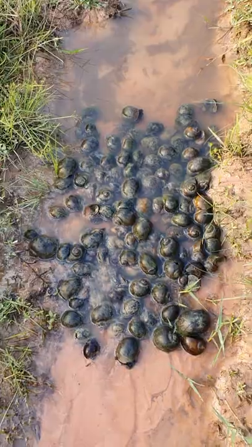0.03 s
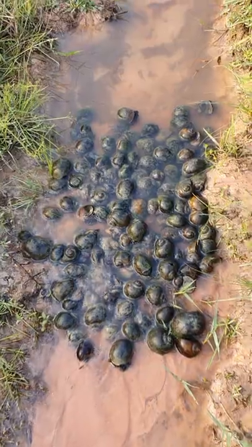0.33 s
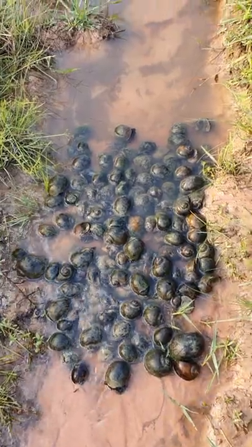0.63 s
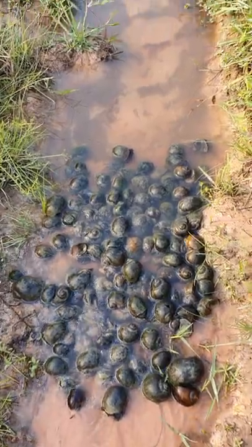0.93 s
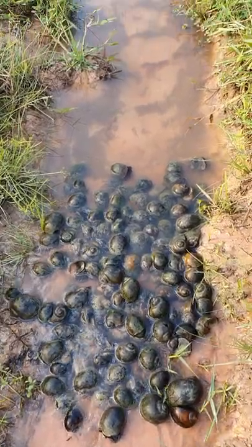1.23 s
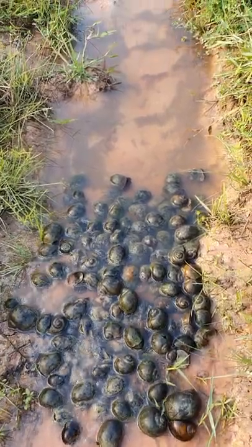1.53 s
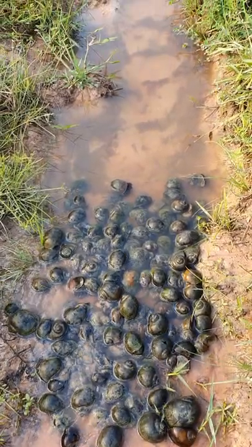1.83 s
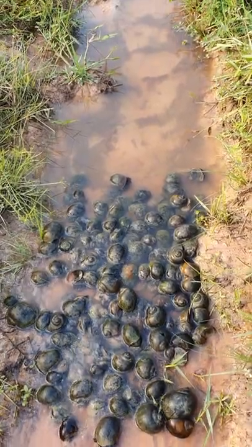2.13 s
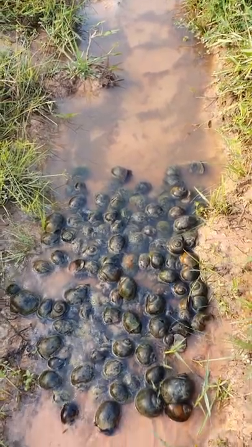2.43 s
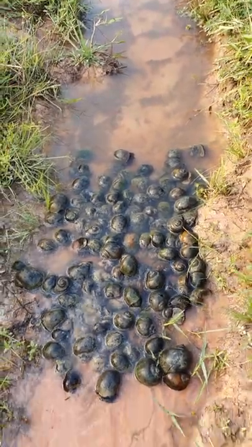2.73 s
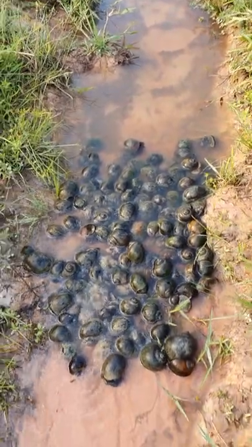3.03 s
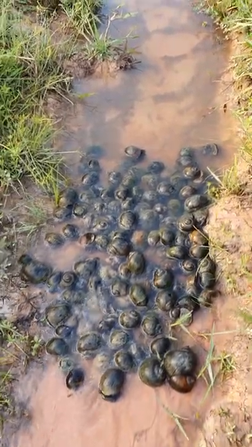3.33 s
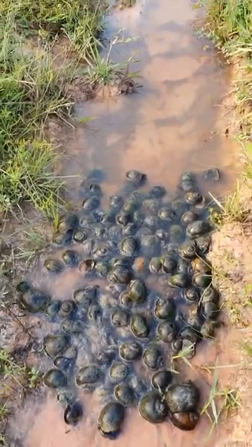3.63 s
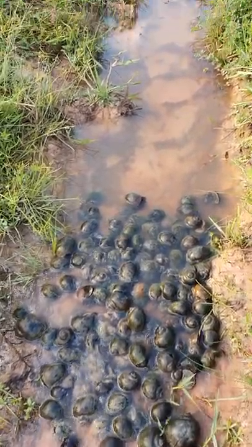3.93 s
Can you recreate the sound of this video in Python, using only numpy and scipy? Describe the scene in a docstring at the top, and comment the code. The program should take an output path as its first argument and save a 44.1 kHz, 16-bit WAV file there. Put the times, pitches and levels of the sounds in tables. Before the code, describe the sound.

Uneven thudding of a far-off engine outdoors, with nearby rustling and faint bird chirps.

```python
"""A slow engine, perhaps a water pump, thuds far off across a muddy ditch: four uneven beats a cycle
over a low rumble. Close by, clothing or grass rustles in swells as fibres rub, catch and let go,
with dull scuffs, thin squeaks, dry ticks and soft handling bumps.
A small bird repeats a falling chip, farther birds twitter, and insects hiss faintly in the open air."""
import sys
import numpy as np
from scipy import signal
from scipy.fft import rfft, irfft
from scipy.io import wavfile

SR = 44100
rng = np.random.default_rng(int(sys.argv[2]) if len(sys.argv) > 2 else 0)


def generate_wav(signal):
    """Clip the signal to [-1, 1] and save it as 16-bit WAV at the path in sys.argv[1]."""
    frames = np.transpose(np.atleast_2d(signal))
    scaled = np.clip(frames, -1, 1) * 32767
    pcm = np.round(scaled).astype(np.int16)
    wavfile.write(sys.argv[1], SR, pcm)


N = 176400
TIME = np.arange(N) / SR

# Every pan is left minus right in dB. Spectra set tone only, as level per Hz.
# the engine's wandering pace: (time [s], speed [cycles/s])
ENGINE_SPEED = [(0, 8.87), (.85, 8.85), (1.25, 9.02), (1.8, 9.06), (2.5, 8.78), (2.87, 9.23), (3.5, 9.3),
                (4, 9.08)]
# its limping rhythm: (position in the cycle [0-1], accent [dB])
ENGINE_BEATS = [(0, -1), (0.267, -4), (0.384, -8.5), (.742, -5.5)]
# one fader for the engine and the far birds: (time [s], gain [dB])
DISTANT_FADER = [(.1, -59.5), (.8, -60), (1.12, -54.5), (1.28, -58), (1.42, -54), (1.6, -52), (2, -49),
                 (2.7, -49), (2.87, -49.5), (3.2, -47.5), (3.65, -47), (4, -51)]
# the boom of one thud: (frequency [Hz], level [dB])
THUD_SPECTRUM = [(20, -31), (42, -4), (65, -0.5), (105, 4.5), (126, -9.5), (142, 0), (155, -6), (170, 3),
                 (190, -12), (235, -9), (320, -24.5), (600, -40), (1200, -60)]
# the low bed under the thuds: (frequency [Hz], level [dB])
RUMBLE_SPECTRUM = [(20, -29), (32, -12), (42, -6), (58, 1), (100, -3), (150, -5), (220, -8), (320, -21.5),
                   (500, -32), (900, -43), (2000, -64.5)]
# swells of rubbing: (time [s], body gain [dB], treble gain [dB])
RUSTLE_SWELLS = [(.1, -88, -97), (.27, -74, -91), (.35, -70, -75), (.54, -66.5, -67.5), (.63, -70.5, -77),
                 (.74, -75.5, -79), (.84, -74.5, -85), (.98, -70, -75.5), (1.13, -64.5, -66.5),
                 (1.27, -68, -77.5), (1.41, -60.5, -63.5), (1.51, -56, -58.5), (1.66, -60.5, -66.5),
                 (1.73, -57, -59), (1.895, -65.5, -69), (1.912, -57, -59.5), (2.03, -61, -67.5),
                 (2.14, -57, -57.5), (2.24, -55.5, -60), (2.29, -51, -53.5), (2.35, -55, -60),
                 (2.47, -60, -65), (2.56, -55, -56.5), (2.67, -60, -63), (2.735, -54, -52.5),
                 (2.78, -61, -66), (2.92, -60, -62), (3.05, -48.5, -53.5), (3.13, -56.5, -58.5),
                 (3.24, -55.5, -60.5), (3.41, -63.5, -67.5), (3.57, -53, -56.5), (3.69, -53, -55),
                 (3.795, -59.5, -60), (3.82, -64, -67.5), (3.88, -64, -64.5), (4, -58.5, -60)]
# the rustle's papery midrange: (frequency [Hz], level [dB])
BODY_SPECTRUM = [(250, -11.5), (550, -15), (850, -13), (1150, -8.5), (1450, -4), (1700, -1), (2000, 1),
                 (2350, 0.5), (2800, -2.5), (4200, -4.5), (5800, -12.5), (7500, -25.5), (10000, -41)]
# the airy top of the rustle and ticks: (frequency [Hz], level [dB])
TREBLE_SPECTRUM = [(5000, -3), (7800, -13.5), (8500, -8), (9300, -1), (10500, -1), (12100, 2), (13500, -1),
                   (16000, -2)]
# the rustle's top slides from right to centre: (time [s], pan [dB])
TREBLE_PAN_PATH = [(0, -15), (1.5, -9), (3, -8), (3.4, -5), (3.7, -0.5), (4, 0.5)]
# harder strokes: (peak time [s], level [dB], half-length [s])
SCUFF_STROKES = [(0.633, -72.5, 0.029), (1.553, -66.5, 0.049), (2.326, -61.5, 0.039), (3.05, -88, .03),
                 (3.19, -63, 0.05), (3.653, -66, 0.13)]
# their dull scrape: (frequency [Hz], level [dB])
SCUFF_SPECTRUM = [(450, -12.5), (700, -1), (1200, 7), (1800, -20), (2600, -29)]
# thin rubbing squeaks: (peak time [s], pitch [Hz], resonance width [Hz], half-length [s], level [dB])
RUB_SQUEAKS = [(.655, 12700, 1200, 0.032, -72), (.738, 12150, 900, 0.023, -67.5),
               (.772, 14500, 1200, .008, -77), (0.794, 12500, 350, .006, -65),
               (1.738, 5740, 700, 0.014, -64), (1.929, 4700, 900, 0.0024, -56.5),
               (2.042, 5470, 400, .005, -62.5)]
# dry snaps: (time [s], level [dB], relative treble [dB], pan [dB])
TICK_HITS = [(0.28, -61, -19, 11), (0.292, -60, -20, 14), (0.306, -55.5, -17, 9), (1.001, -62.5, 15, -15),
             (1.011, -50, 2.5, 3), (1.026, -54, 9.5, -7), (1.664, -40, -8, 6), (1.667, -55, -15, 0),
             (1.706, -52, -14, 9), (1.907, -49.5, -5, 3), (2.679, -46, -23, 17), (2.71, -43.5, -18, 16),
             (2.851, -61, 11, -13), (3.097, -50, -13, 5), (3.254, -46.5, -2, 7), (3.604, -50, -14, 18),
             (3.662, -42.5, -21, 22), (3.792, -47, -2, 3)]
# the ring of a snap: (frequency [Hz], width [Hz], gain [dB])
TICK_MODES = [(2250, 800, 0), (4000, 1200, -4), (5500, 1200, -8)]
# shifts of the hand: (peak time [s], level [dB], half-length [s])
HAND_BUMPS = [(0.302, -62.5, 0.013), (0.626, -78.5, .02), (1.886, -73, 0.071), (2.327, -74, 0.036),
              (2.706, -60, 0.044), (3.15, -69.5, .04), (3.602, -65, 0.014), (3.659, -50.5, 0.0023)]
# hollow resonances of the held casing: (frequency [Hz], width [Hz], gain [dB])
CASING_MODES = [(269, 17, -3), (397, 71, 0), (568, 38, -1.5), (767, 84, -3)]
# the small bird's calls: (time [s], level [dB])
BIRD_CHIPS = [(0.9, -59), (1.671, -52.5), (2.405, -52.5)]
# notes around each chip: (offset [s], start pitch [Hz], end pitch [Hz], length [s], relative level [dB])
GRACE_NOTES = [(-.046, 5600, 4600, .022, -13), (-.013, 3900, 4800, .014, -9), (.025, 3200, 3350, .011, -8)]
# a thin insect hiss near 9 kHz: (frequency [Hz], level [dB])
INSECT_SPECTRUM = [(7500, -60), (8500, -14), (9100, 2.5), (9500, 1), (10200, -10), (12000, -22),
                   (16000, -23)]
# the outdoor air bed: (frequency [Hz], level [dB])
AIR_SPECTRUM = [(200, 13), (800, -11), (1300, -1), (2600, -2.5), (4200, -7), (6000, -25), (8000, -41)]

FIRST_BEAT_S, BEAT_SPREAD_DB, THUD_DB = .089, 1.9, -2.5
RUMBLE_DB, RUMBLE_ROUGH_DB, THROB_DB, THROB_PEAK_CYCLES = -4.5, 2, 1, .28
BODY_TRIM_DB, TREBLE_TRIM_DB, FLUTTER_DB, BAND_FLICKER_DB = 1, 4, 1.17, 2
BODY_LIKENESS, TREBLE_LIKENESS = .37, .15  # 0 is wide, 1 is mono
GRAINS_PER_S, GRAIN_SPREAD_DB, GRAIN_DB = 3500, 3.5, -5.5
CRACKLES_PER_S, CRACKLE_DECAY_S, TICK_DECAY_S = 18, .002, .0033
TWITTERS_PER_S, TWITTER_LOW_HZ, TWITTER_HIGH_HZ, TWITTER_DB, TWITTER_RANGE_DB = 16, 1400, 4200, -17, 4
INSECT_DB, AIR_DB = -80, -77.5


def engine():
    """Four uneven thuds a cycle, dulled by distance, over a low rumble that throbs with them."""
    cycles = np.cumsum(curves(ENGINE_SPEED)[0]) / SR
    cycles -= np.interp(FIRST_BEAT_S, TIME, cycles)
    pulses = np.zeros(N)
    for position, accent_db in ENGINE_BEATS:
        hits = np.flatnonzero(np.diff(np.floor(cycles - position)))
        pulses[hits] += from_db(accent_db + BEAT_SPREAD_DB * rng.standard_normal(N)[:len(hits)])
    thuds = from_db(THUD_DB) * colour(pulses, THUD_SPECTRUM)
    throb_db = THROB_DB * np.cos(2 * np.pi * (cycles - THROB_PEAK_CYCLES))
    rumble_gain = from_db(RUMBLE_DB + throb_db + RUMBLE_ROUGH_DB * drift(rate_hz=24.8))
    rumble = rumble_gain * colour(stereo_noise(likeness=.93), RUMBLE_SPECTRUM)
    return (thuds + rumble) * from_db(curves(DISTANT_FADER)[0])


def rustle():
    """Fluttering swells of friction with a crackly body near 2 kHz and an airy top."""
    body_db, treble_db = curves(RUSTLE_SWELLS)
    body = flicker(colour(friction(BODY_LIKENESS) + crackles(), BODY_SPECTRUM))
    body *= from_db(body_db + BODY_TRIM_DB) * pan(db=6.5)
    treble = colour(friction(TREBLE_LIKENESS), TREBLE_SPECTRUM)
    treble *= from_db(treble_db + TREBLE_TRIM_DB) * pan(curves(TREBLE_PAN_PATH)[0])
    return (body + treble) * from_db(FLUTTER_DB * drift(rate_hz=120))


def friction(likeness):
    """Smooth hiss plus the tiny snaps of catching fibres."""
    sizes = from_db(GRAIN_SPREAD_DB * np.minimum(rng.exponential(1, (2, N)), 5))
    polarity = rng.choice([-1, 1], (2, N))
    catches = rng.random((2, N)) < GRAINS_PER_S / SR
    grains = from_db(GRAIN_DB) * unit_rms(sizes * polarity * catches)
    return from_right(stereo_noise(likeness) + grains)


def crackles():
    """Now and then a fibre catches and lets go in a short burst."""
    catches = (rng.random(N) < CRACKLES_PER_S / SR) * rng.random(N)
    decay = np.exp(-1 / (CRACKLE_DECAY_S * SR))
    bursts = signal.lfilter([1], [1, -decay], catches + 1e-18)
    return 2 * bursts * from_right(stereo_noise(BODY_LIKENESS))


def scuffs():
    """Harder strokes press a dull scrape out of the friction."""
    pressure = sum(from_db(db) * swell(peak_s, half_s) for peak_s, db, half_s in SCUFF_STROKES)
    return pressure * colour(friction(likeness=1), SCUFF_SPECTRUM) * pan(db=-.5)


def squeaks():
    """The rubbing briefly sings: noise narrowed twice by one high resonance."""
    out = np.zeros((2, N))
    for peak_s, hz, width_hz, half_s, db in RUB_SQUEAKS:
        mode = [(hz, width_hz, 0)]
        whine = resonate(resonate(stereo_noise(likeness=.42), mode), mode)
        out += from_db(db) * swell(peak_s, half_s) * unit_rms(whine)
    return out


def ticks():
    """Dry snaps that die within milliseconds, each with its own brightness and pan."""
    body_envelope, top_envelope = np.zeros((2, 2, N))
    for start_s, db, treble_db, pan_db in TICK_HITS:
        decay = np.exp(-np.clip((TIME - start_s) / TICK_DECAY_S, 0, 20))
        snap = from_db(db) * (TIME >= start_s) * decay * pan(pan_db)
        body_envelope += snap
        top_envelope += snap * from_db(treble_db)
    body = resonate(body_envelope * from_right(stereo_noise(likeness=1)), TICK_MODES)
    top = top_envelope * colour(stereo_noise(likeness=.2), TREBLE_SPECTRUM)
    return body + top


def handling_bumps():
    """Soft shifts of the hand sound the hollow modes of the casing."""
    push = sum(from_db(db) * swell(peak_s, half_s) for peak_s, db, half_s in HAND_BUMPS)
    return resonate(push * from_right(stereo_noise(likeness=.8)), CASING_MODES) * pan(db=2)


def small_bird():
    """A quick falling chip on the left, with weaker notes before and after."""
    calls = np.zeros(N)
    for start_s, db in BIRD_CHIPS:
        calls += from_db(db) * whistle(start_s, start_hz=4440, end_hz=2980, length_s=.021)
        for offset_s, start_hz, end_hz, length_s, note_db in GRACE_NOTES:
            calls += from_db(db + note_db) * whistle(start_s + offset_s, start_hz, end_hz, length_s)
    return scatter(calls) * pan(db=21)


def far_birds():
    """Faint short glides at random moments, riding the same fader as the engine."""
    calls = np.zeros(N)
    for when, pitch, glide, softness in rng.random((int(TWITTERS_PER_S * N / SR), 4)):
        start_hz = TWITTER_LOW_HZ * (TWITTER_HIGH_HZ / TWITTER_LOW_HZ) ** pitch
        end_hz = start_hz * (1 + .319 * (glide - .5))  # up to 16% up or down
        gain = from_db(TWITTER_DB - TWITTER_RANGE_DB * softness)
        calls += gain * whistle(when * N / SR, start_hz, end_hz, length_s=.03)
    return scatter(calls) * from_db(curves(DISTANT_FADER)[0]) * pan(db=16)


def whistle(start_s, start_hz, end_hz, length_s, waver_hz=90):
    """One bird note: a gliding, wavering sine that fades in and out."""
    first = int(start_s * SR)
    progress = np.arange(int(length_s * SR))[:N - first] / (length_s * SR)
    waver = np.interp(progress, np.linspace(0, 1, 10), rng.standard_normal(10))
    hz = start_hz + (end_hz - start_hz) * progress + waver_hz * waver
    out = np.zeros(N)
    out[first:first + len(hz)] = np.sin(np.pi * progress) * np.sin(2 * np.pi * np.cumsum(hz) / SR)
    return out


def scatter(call, decay_s=.01, wet_db=-5):
    """Grass and banks smear a far call into a short stereo tail."""
    t = TIME[:SR // 10]
    tail = rng.standard_normal((2, len(t))) * np.exp(-t / decay_s)
    tail /= np.sqrt(np.sum(tail[0] ** 2))
    return call + from_db(wet_db) * signal.fftconvolve(call[None], tail, axes=1)[:, :N]


def insects():
    """A thin steady band of hiss on the right, probably insects."""
    return from_db(INSECT_DB) * colour(stereo_noise(likeness=.1), INSECT_SPECTRUM) * pan(db=-11)


def outdoor_air():
    """A faint, wide bed of air, leaning left."""
    return from_db(AIR_DB) * colour(stereo_noise(likeness=.15), AIR_SPECTRUM) * pan(db=13)


def flicker(pair, bands=12, low_hz=1000, high_hz=7000):
    """Overlapping bands each waver in level; the outer two carry all below and above."""
    hz = np.maximum(np.arange(N // 2 + 1) * SR / N, 1)
    position = np.clip(np.log(hz / low_hz) / np.log(high_hz / low_hz), 0, 1) * (bands - 1)
    spectrum = rfft(pair)
    out = np.zeros((2, N))
    for k in range(bands):
        band = irfft(spectrum * np.maximum(1 - abs(position - k), 0), N)
        out += band * from_db(BAND_FLICKER_DB * drift(rate_hz=60))
    return unit_rms(out)


def colour(x, spectrum):
    """Minimum-phase EQ, so hits ring only after their attack; comes out at unit RMS."""
    hz, db = np.transpose(spectrum)
    bin_hz = np.maximum(np.arange(N // 2 + 1) * SR / N, 1)
    skirts = np.minimum(bin_hz / hz[0], 1) ** 2 * np.minimum(hz[-1] / bin_hz, 1) ** 2
    gain = skirts * from_db(np.interp(np.log(bin_hz), np.log(hz), db))
    cepstrum = irfft(np.log(gain), N)
    response = np.exp(rfft(2 * cepstrum[:N // 2], N) - cepstrum[0])
    return unit_rms(irfft(rfft(x) * response, N))


def resonate(x, modes):
    """Parallel resonances of alternating polarity; unit white noise leaves each at its listed level."""
    out = 0
    for k, (hz, width_hz, db) in enumerate(modes):
        radius = np.exp(-np.pi * width_hz / SR)
        feedforward = np.sqrt((1 - radius ** 2) / 2) * np.array([1, 0, -1])
        feedback = [1, -2 * radius * np.cos(2 * np.pi * hz / SR), radius ** 2]
        out += (-1) ** k * from_db(db) * signal.lfilter(feedforward, feedback, x + 1e-18)
    return out


def stereo_noise(likeness):
    """White noise; likeness is the share of power common to both sides."""
    centre = np.sqrt(likeness) * rng.standard_normal(N)
    return centre + np.sqrt(1 - likeness) * rng.standard_normal((2, N))


def from_right(pair, lag_s=.00041):
    """Sound from the right reaches the left side a little later."""
    return np.array([np.interp(TIME - lag_s, TIME, pair[0]), pair[1]])


def pan(db):
    """Left and right gains of constant power."""
    gains = from_db(np.array([[.5], [-.5]]) * db)
    return gains / np.sqrt(np.mean(gains ** 2, axis=0))


def drift(rate_hz):
    """A random wobble with a spread of about 1."""
    times = np.arange(0, N / SR + 1, 1 / rate_hz)
    return np.interp(TIME, times, rng.standard_normal(N)[:len(times)])


def swell(peak_s, half_s):
    """A bell-shaped fade, at 61% half_s either side of its peak."""
    return np.exp(-.5 * ((TIME - peak_s) / half_s) ** 2)


def curves(rows):
    """One automation curve for each column after the time."""
    times, *columns = np.transpose(rows)
    return [np.interp(TIME, times, column) for column in columns]


def from_db(db):
    return 10 ** (np.asarray(db) / 20)


def unit_rms(x):
    return x / np.sqrt(np.mean(x ** 2) + 1e-20)


def scene():
    """The stereo mix: far engine, close rubbing and handling, then the life around the ditch."""
    return (engine() + rustle() + scuffs() + squeaks() + ticks() + handling_bumps()
            + insects() + outdoor_air() + small_bird() + far_birds())


def record(dry):
    """The sound opens after a moment of silence, with the very top cut away."""
    start_s, cutoff_hz = .084, 15800
    low_pass = signal.firwin(401, cutoff_hz, fs=SR)
    return signal.fftconvolve(dry * (TIME >= start_s), low_pass[None], mode="same", axes=1)


dry = scene()
out = record(dry)
generate_wav(out)
```